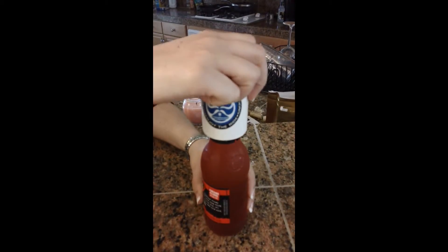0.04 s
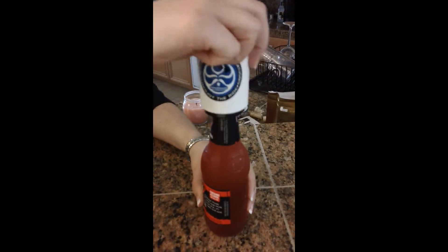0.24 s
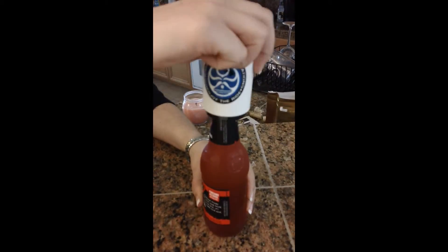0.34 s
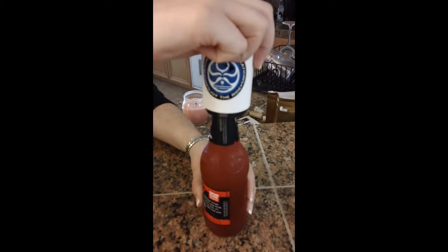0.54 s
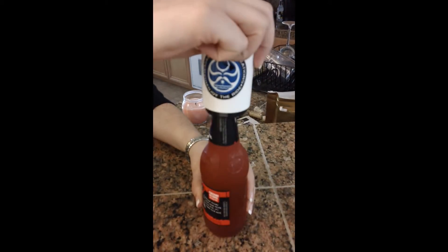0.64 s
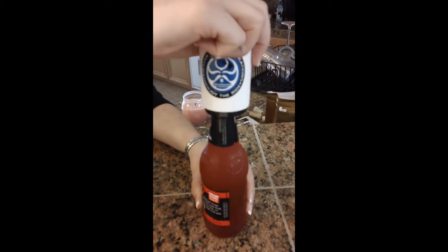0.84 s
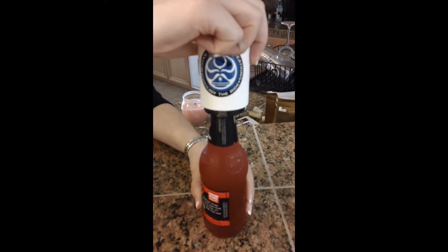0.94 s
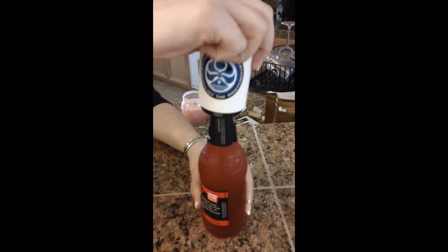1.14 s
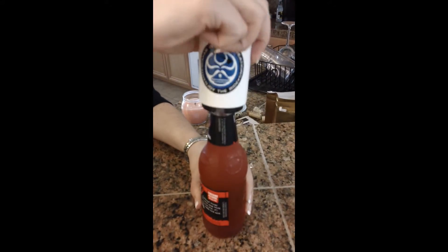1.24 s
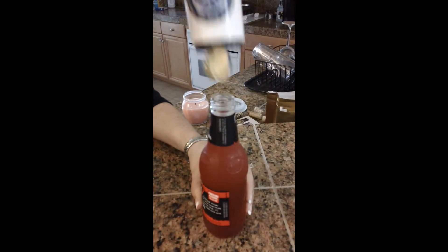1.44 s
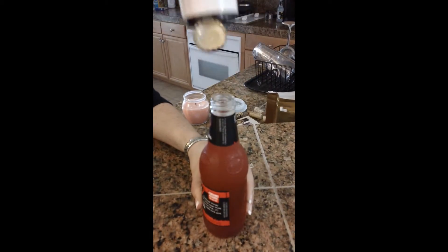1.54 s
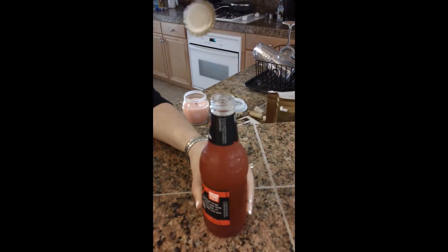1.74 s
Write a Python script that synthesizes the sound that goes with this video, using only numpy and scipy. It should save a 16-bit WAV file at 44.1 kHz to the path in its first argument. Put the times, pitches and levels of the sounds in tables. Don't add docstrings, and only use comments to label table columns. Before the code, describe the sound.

A push-down bottle opener scrapes and snaps hard onto a cap, then cracks it off, ringing

```python
import sys
import numpy as np
from scipy import signal
from scipy.fft import rfft, irfft
from scipy.io import wavfile
from scipy.ndimage import uniform_filter1d

SR = 44100
rng = np.random.default_rng(int(sys.argv[2]) if len(sys.argv) > 2 else 0)


def unload_audio(sound):
    columns = np.transpose(np.atleast_2d(sound))
    steps = np.round(np.clip(columns, -1, 1) * 32767)
    wavfile.write(sys.argv[1], SR, steps.astype(np.int16))


def ratio(d):
    e = np.asarray(d, float) / 20
    return 10 ** e


N = 79380

# pitch_hz, level_db (per Hz)
AIR_COLOUR = [(25, -29), (200, -10), (330, -14), (420, -14), (800, -23.5), (1500, -30.5), (3000, -102.5)]
HISS_COLOUR = [(350, -74.5), (600, -1), (1000, -11.5), (2140, -13), (9000, -22.5), (15300, -34)]
AIR_DB, HISS_DB = -53, -56.5
# pitch_hz, level_db, width_hz
FRIDGE_TONES = [(270.6, -49, 8), (241.7, -54, 4.8), (119.6, -60.5, 3.8), (180.4, -70.5, 31.7)]
# pitch_hz, level_db (per Hz)
CLATTER_COLOUR = [(300, 0), (550, 5), (2300, -11), (5000, -19), (9000, -27.5)]
CLATTER_DB, CLATTER_T60_S = -40.5, 0.67
# time_s, rumble_db, hiss_db
PHONE_GAIN = [
    (0, 8, 1.5),
    (.22, 5, 8),
    (.28, -8, 20),
    (.55, -1, -1.5),
    (.9, 3.5, -1),
    (1.1, 5, 4),
    (1.335, 5.5, 3.5),
    (1.37, -15, 16),
    (1.6, -9.5, -7.5),
    (1.8, -5, -2),
]

# pitch_hz, level_db (per Hz)
CONTACT_COLOUR = [(150, -39.5), (1260, 10), (3300, 9.5), (9000, 7.5), (15300, 0)]
# start_s, ring_db, crack_db, contact_ms, pitch_factor
STEEL_TICKS = [
    (.012, -75, -50.5, 2.4, .99),
    (.2291, -6.5, -45.5, 1, 0.985),
    (.276, -36, -47, 5, 2.47),
    (.3625, -70, -28.5, 3.8, 1),
    (.3832, -65, -30, 0.76, 1),
    (.4424, -42, -32.5, 4.4, 1.1),
    (.4766, -48, -23.5, 2, 0.976),
    (1.0824, -57, -37, 0.63, 0.81),
]
# pitch_hz, level_db, t60_s
JAW_NOTES = [(4745, -5.5, 0.0069), (7220, -15, 0.0098), (11410, -8, 0.015)]
# start_s, level_db, pitch_hz, contact_ms, t60_s
PRESS_CHINKS = [(.012, -46, 7700, 0.98, .006), (.012, -43, 4650, 1.7, 0.0079),
                (.2125, -36, 3900, 0.78, 0.0049), (.2185, -19.5, 4250, 0.97, 0.0044),
                (.224, -24, 4500, 1, 0.005), (.2322, -15, 11400, .9, 0.0074),
                (.2388, -17, 5600, .8, 0.0035), (.2415, -22, 4600, 1.3, 0.0092),
                (.2445, -29, 5300, 1, 0.0051), (.2465, -26, 4700, 2, 0.0097), (.2505, -25, 11000, .8, .006),
                (.2515, -19, 1300, 0.45, 0.0046), (.2555, -32, 5100, 0.97, 0.0065),
                (.2575, -25, 8000, 1.12, 0.008), (.2585, -31, 11000, 1.1, 0.0068),
                (.2775, -33, 5000, 1.5, 0.0088), (.2795, -28, 6500, 0.67, 0.0046),
                (.2805, -25.5, 1100, 1.4, .012), (.2855, -24.5, 2150, 0.94, .008),
                (.2915, -22.5, 2300, 0.89, .01), (.3475, -35, 5200, .8, .005),
                (.3635, -33.5, 9000, 1.3, 0.005), (.3648, -28, 5200, 1.9, 0.0079),
                (.3715, -41, 11350, 4, 0.0187), (.4768, -36.5, 1600, 1.1, 0.0026),
                (.4768, -41, 5220, 1.4, 0.011), (.383, -34.5, 2600, 1.1, .006)]
LIFT_CHINKS = [(1.363, -35.5, 517, 1.8, 0.016), (1.3645, -31.5, 1280, 1.7, .012),
               (1.3705, -29.5, 733, 1.2, 0.021), (1.083, -37.5, 2810, .8, .006),
               (1.2205, -36.5, 1080, 0.56, 0.0067), (1.685, -42, 4500, 0.75, .005),
               (1.6872, -45, 5220, 0.96, .005), (1.6872, -39, 2920, 0.51, 0.0046),
               (1.687, -55.5, 7900, 3, .012), (1.6903, -34.5, 2264, 1.7, 0.0057),
               (1.691, -62, 6700, 3.8, 0.025), (1.695, -35, 4830, 1.3, .008), (1.6955, -38, 2600, 3, .012),
               (1.7085, -37.5, 8340, 0.84, 0.0055), (1.7085, -36, 4500, 0.78, 0.035),
               (1.7095, -37.5, 5360, .8, 0.007), (1.7095, -42, 3590, 1.46, 0.017),
               (1.7105, -35.5, 7400, 0.63, 0.0064), (1.7095, -52, 11200, 1.1, 0.0069),
               (1.7492, -36.5, 5130, 0.58, 0.0075), (1.7492, -37, 2990, 0.94, 0.0086),
               (1.7495, -43, 1160, 1.4, 0.016)]

# start_s, ring_db, crack_db, contact_ms, pitch_factor
SLEEVE_KNOCKS = [(.2012, -21.5, -60, 0.29, 0.94), (.226, -30, -67, 2, .75), (.2485, -28, -42, 1.4, 0.62),
                 (.348, -29.5, -31, 1.5, 1.18), (.4815, -35.5, -59, 0.65, 0.5),
                 (.9787, -34.5, -54, 0.65, 1.13), (1.085, -26.5, -48.5, 0.75, 1.035),
                 (1.103, -42, -36, 1.4, 1.3), (1.2203, -59, -44, 0.82, 1.8),
                 (1.686, -45.5, -54.5, 5.2, 1.2), (1.2535, -29.5, -51, 0.4, 1.09),
                 (1.3622, -53, -16, 1.6, 0.44), (1.371, -42, -36, 1.4, 1.3)]
# pitch_hz, level_db, t60_s
SLEEVE_NOTES = [(778, 6, 0.026), (641.5, 2, 0.068), (1472, -4.5, 0.025)]

# time_s, level_db
SCRAPE_LEVEL = [
    (.206, -52),
    (.214, -35),
    (.228, -31),
    (.238, -26.5),
    (.25, -22.5),
    (.259, -21.5),
    (.263, -29.5),
    (.278, -29),
    (.31, -71),
]
# pitch_hz, level_db (per Hz)
SCRAPE_COLOUR = [(200, -16), (450, -1.5), (870, -17.5), (1250, -12.5), (4600, -13.5), (12000, -13),
                 (15300, -14)]
BITE_S, DULL_DB = .2285, -9.5

# start_s, ring_db, crack_db, contact_ms, pitch_factor
RIM_JINGLES = [
    (.2125, -35, -32, 2.6, 0.9),
    (.2184, -23.5, -30.5, 2.53, 0.81),
    (1.5883, -39, -33.5, 2, 0.99),
    (1.6865, -51, -57, 2.2, 1.1),
    (1.692, -55, -40.5, 6, 1.6),
    (1.7083, -38.5, -36, 5, 1),
    (1.7492, -45, -38, 1.7, 0.91),
]
# pitch_hz, level_db, t60_s
RIM_NOTES = [(990, -17, 0.035), (2720, 5.5, 0.0086), (4930, 3, 0.0068), (5090, -1.5, 0.012)]

# start_s, ring_db, crack_db, contact_ms, pitch_factor
SNAP_BLOWS = [
    (.2652, -1.5, -3, .3, 1),
    (.2664, -13, -10, 0.7, 1),
]
# pitch_hz, level_db, t60_s
SNAP_NOTES = [(549, -16, 0.04), (1180, -7, .009), (2290, -8, 0.012), (3940, -6, 0.005), (6150, -1, .007),
              (8800, 0, 0.004)]
# pitch_hz, level_db (per Hz)
SNAP_COLOUR = [(20, 21.5), (1500, -8), (9000, 4.5), (11000, -9.5), (15300, -12)]
SHOCK_S, SHOCK_DB, SHOCK_MS = .26535, 1, .06
THUMP_DB, THUMP_MS = -29, .5

# start_s, ring_db, crack_db, contact_ms, pitch_factor
LIFT_BLOWS = [
    (1.3448, -5, -3, 1.0, 1),
    (1.3458, -13, -9, 1.8, 1),
]
# pitch_hz, level_db, t60_s
LIFT_NOTES = [(1070, -8, 0.034), (1600, 5.5, 0.0031), (2320, -4, 0.0039), (2900, -7, 0.008),
              (4696, -1.5, 0.019), (7780, -4.5, 0.017), (10590, 3.5, 0.0082)]
# pitch_hz, level_db (per Hz)
LIFT_COLOUR = [(300, -57.5), (1400, -1.5), (6000, 12), (10500, 18.5), (15300, -2)]
# time_s, level_db
GAS_LEVEL = [
    (1.348, -45),
    (1.36, -27),
    (1.52, -74),
]
# time_s, pitch_hz, level_db
MOUTH_GULP = [
    (1.355, 500, -36.5),
    (1.364, 1020, -47),
    (1.385, 1418, -38),
    (1.40, 1600, -56),
    (1.42, 1640, -56),
]

# start_s, ring_db, crack_db, contact_ms, pitch_factor
CAP_HITS = [
    (1.3635, -27, -60, 3, 1),
    (1.372, -28, -60, 2, 1),
    (1.3801, -15.5, -55, 1, 1),
    (1.3872, -17, -55, 2.2, 1),
    (1.406, -28, -60, 1.5, 1),
    (1.4165, -32, -60, 1, .93),
]
# pitch_hz, level_db, t60_s
CAP_NOTES = [(4710, 0, .018), (4590, -14, .06), (4810, -13, .04), (4330, -20, .04)]
# pitch_hz, width_hz, level_db
SHIVER_BANDS = [(4320, 270, -41.5), (4675, 180, -43.5)]
SHIVER_S, SHIVER_T60_S = 1.36, .6

# pitch_hz, t60_s
ROOM_ECHO = [(250, 1), (1500, 0.57), (8000, 0.46), (15000, 0.16)]
# pitch_hz, level_db (per Hz)
SIDE_COLOUR = [(25, 8.5), (150, 3.5), (1000, 3.5), (3000, 6), (10000, 5), (15000, -10)]
# pitch_hz, level_db
MIC_RESPONSE = [(11600, 0), (12200, -11), (12750, -29), (13050, -13.5), (13500, 6), (15200, 8),
                (15500, -21.5), (16600, -47.5)]
ROOM_DB, SIDE_DB = -14, -71
QUIET_DB = -57


def evened(x):
    return x / np.sqrt(np.mean(x ** 2) + 1e-20)


def shaped(x, points):
    f, db = np.transpose(points)
    hz = np.fft.rfftfreq(x.shape[-1], 1 / SR)
    gain = ratio(np.interp(np.log(hz + 1), np.log(f + 1), db))
    return irfft(rfft(x) * gain, x.shape[-1])


def curve(rows, column=1):
    columns = np.transpose(rows)
    return np.interp(np.arange(N) / SR, columns[0], columns[column], -150, -150)


def resonate(x, hz, width):
    turn = np.exp(2j * np.pi * np.cumsum(hz * np.ones(len(x))) / SR)
    r = np.exp(-np.pi * width / SR)
    return 2 * (turn * signal.lfilter([1 - r], [1, -r], x / turn)).real


def strikes(rows, modes, colour=CONTACT_COLOUR, rough=1.3):
    size = 8192
    out, t = np.zeros(N + size), np.arange(size) / SR
    for s, ring_db, crack_db, ms, pitch in rows:
        noise, grit = rng.standard_normal((2, size))
        ms = max(ms, .1)
        touch = np.minimum(t * 2000 / ms, 1) * np.exp(-t * 1000 / ms)
        crack = evened(shaped(noise, colour)) * touch
        push = touch * (1 + rough * grit)
        ring = np.zeros(size)
        for mode_hz, db, t60 in modes:
            hz, phase = mode_hz * pitch, rng.random()
            if hz < 11800:
                drive = push * np.sin(2 * np.pi * (hz * t + phase))
                note = ratio(-60 * t / t60) * np.cos(2 * np.pi * hz * t)
                ring += ratio(db) * signal.oaconvolve(drive, note)[:size]
        at = round(s * SR)
        out[at:at + size] += ratio(crack_db) * crack + ratio(ring_db) * ring / abs(ring).max()
    return out[:N]


def kitchen():
    a, b, c = rng.standard_normal((3, N))
    t = np.arange(N) / SR
    low = ratio(AIR_DB) * evened(shaped(a, AIR_COLOUR))
    for hz, db, width in FRIDGE_TONES:
        waver = evened(resonate(rng.standard_normal(N), hz, width))
        low += ratio(db) * (np.sin(2 * np.pi * hz * t) + 0.13 * waver)
    hiss = ratio(HISS_DB) * evened(shaped(b, HISS_COLOUR))
    clatter = ratio(CLATTER_DB - 60 * t / CLATTER_T60_S) * evened(shaped(c, CLATTER_COLOUR))
    return low * ratio(curve(PHONE_GAIN)) + hiss * ratio(curve(PHONE_GAIN, column=2)) + clatter


def steel_ticks():
    return strikes(STEEL_TICKS, JAW_NOTES)


def chinks(rows):
    out = np.zeros(N)
    for s, db, hz, ms, t60 in rows:
        out += strikes([(s, db, -120, ms, 1)], [(hz, 0, t60)], rough=1.4)
    return out


def sleeve_knocks():
    return strikes(SLEEVE_KNOCKS, SLEEVE_NOTES)


def slide():
    slips = rng.standard_normal(N) * ratio(2 * np.minimum(rng.exponential(1, N), 3))
    clumps = ratio(1.6 * evened(uniform_filter1d(rng.standard_normal(N), 50)))
    body = evened(shaped(slips, SCRAPE_COLOUR))
    # pitch_hz, width_hz, level_db
    for hz, width, db in [(4670, 640, -9), (5370, 346, -11.5), (7900, 170, -24.0),
                          (11200, 270, -43), (2540, 330, -13.0)]:
        body += ratio(db) * evened(resonate(slips, hz, width))
    dull = shaped(body, [(6000, 0.0057), (10000, DULL_DB)])
    scrape = np.where(np.arange(N) / SR < BITE_S, dull, body)
    return scrape * clumps * ratio(curve(SCRAPE_LEVEL))


def rim_jingles():
    return strikes(RIM_JINGLES, RIM_NOTES)


def snap():
    return strikes(SNAP_BLOWS, SNAP_NOTES, SNAP_COLOUR)


def shock():
    ms = np.maximum(np.arange(N) / SR - SHOCK_S, 0) * 1000
    fast, slow = ms / SHOCK_MS, ms / THUMP_MS
    wave = fast * (3 - fast * 1.5) * np.exp(-fast)
    thump = slow * np.exp(1 - slow)
    return ratio(SHOCK_DB) * wave + ratio(THUMP_DB) * thump


def lift_crack():
    return strikes(LIFT_BLOWS, LIFT_NOTES, LIFT_COLOUR)


def opening():
    a, b = rng.standard_normal((2, N))
    hz = np.maximum(curve(MOUTH_GULP), 300)
    gulp = evened(resonate(resonate(a, hz, 156), hz, 270)) * ratio(curve(MOUTH_GULP, column=2))
    gas = evened(shaped(b, SCRAPE_COLOUR)) * ratio(curve(GAS_LEVEL) - 4.5)
    return gulp + gas


def shiver():
    t = np.arange(N) / SR - SHIVER_S
    bands = np.zeros(N)
    for hz, width, db in SHIVER_BANDS:
        noise = rng.standard_normal(N)
        bands += ratio(db) * evened(resonate(resonate(noise, hz, width), hz, width))
    return bands * np.clip(t / .01, 0, 1) * ratio(-60 * np.maximum(t, 0) / SHIVER_T60_S)


def cap_rings():
    return strikes(CAP_HITS, CAP_NOTES, rough=0.42)


def room(x):
    taps = np.zeros(SR)
    at = np.arange(200, SR - 20, 20)
    taps[at + rng.integers(0, 20, len(at))] = rng.choice([-1., 1.], len(at))
    hz, t, z = signal.stft(taps, SR, nperseg=256)
    f, t60 = np.transpose(ROOM_ECHO)
    fade = ratio(-60 * t / np.interp(hz, f, t60)[:, None])
    tail = signal.istft(z * fade, SR, nperseg=256)[1]
    return signal.fftconvolve(x, tail / np.linalg.norm(tail))[:N]


def scene():
    press = steel_ticks() + chinks(PRESS_CHINKS) + sleeve_knocks() + slide() + snap() + shock()
    lift = rim_jingles() + lift_crack() + opening() + chinks(LIFT_CHINKS)
    cap = shiver() + cap_rings()
    echo = room(press + ratio(-0.5) * lift + ratio(-13) * cap)
    echo = shaped(echo, [(100, -25.0), (300, -1.0)])
    objects = press + lift + cap + ratio(ROOM_DB) * echo
    quiet = uniform_filter1d(np.diff(objects, prepend=0) ** 2, size=2048) < ratio(QUIET_DB) ** 2
    side = evened(shaped(rng.standard_normal(N), SIDE_COLOUR))
    side *= ratio(SIDE_DB) * ratio(curve(PHONE_GAIN, column=2)) * quiet
    mono = objects + kitchen()
    return np.array([mono + side, mono - side])


def low_pass(x):
    return signal.sosfilt(signal.butter(12, 16620, fs=SR, output="sos"), x)


def record(dry):
    heard = shaped(dry, MIC_RESPONSE)
    mix = np.clip(heard, -1, 1)
    return low_pass(mix)


dry = scene()
out = record(dry)
unload_audio(out)
```